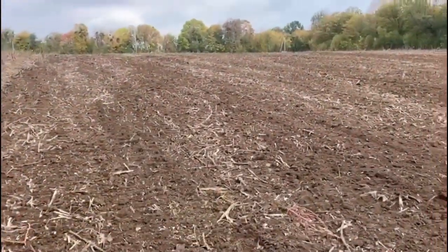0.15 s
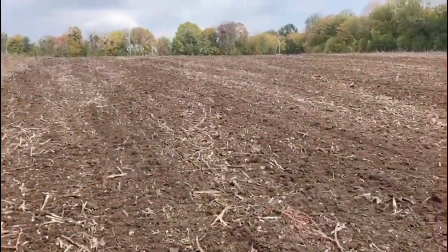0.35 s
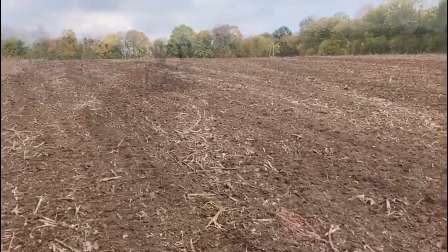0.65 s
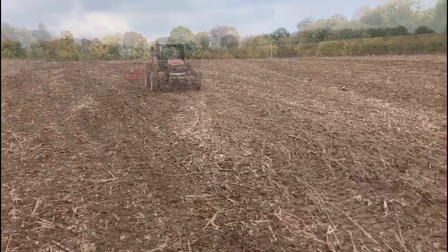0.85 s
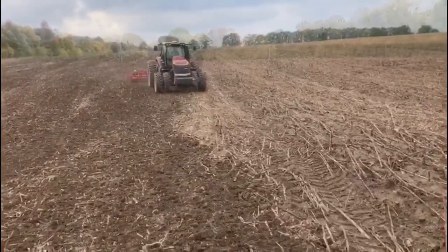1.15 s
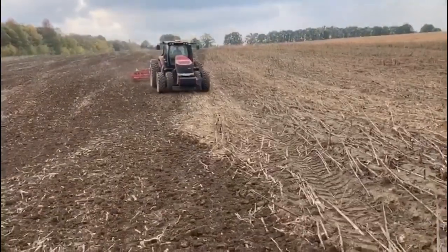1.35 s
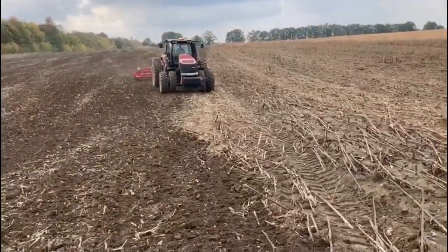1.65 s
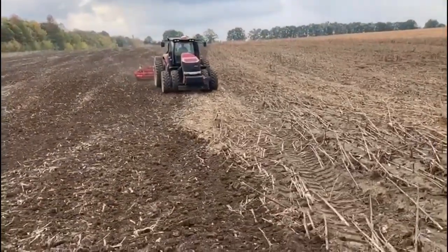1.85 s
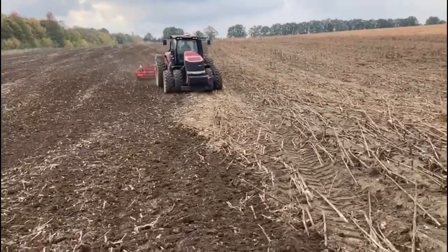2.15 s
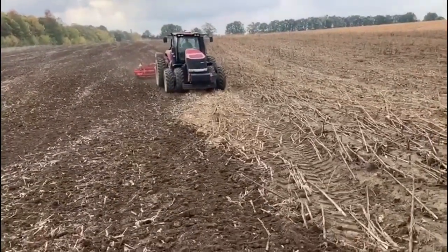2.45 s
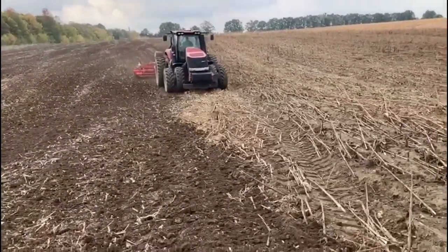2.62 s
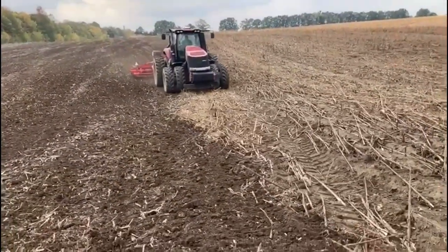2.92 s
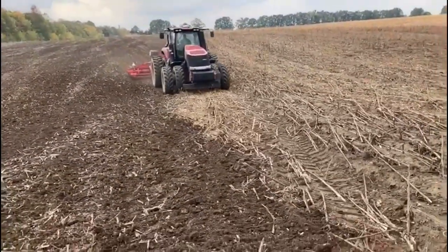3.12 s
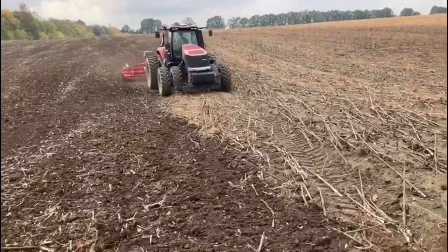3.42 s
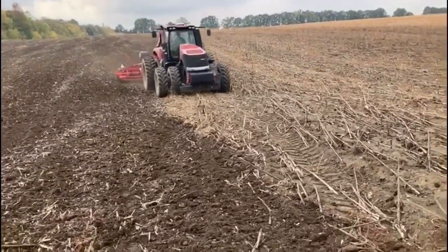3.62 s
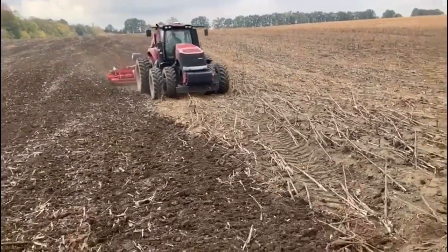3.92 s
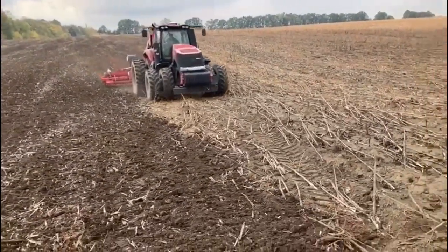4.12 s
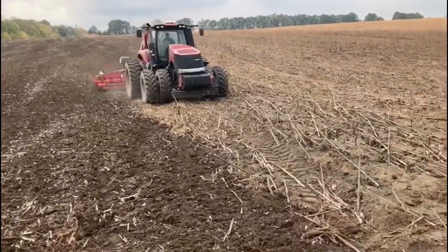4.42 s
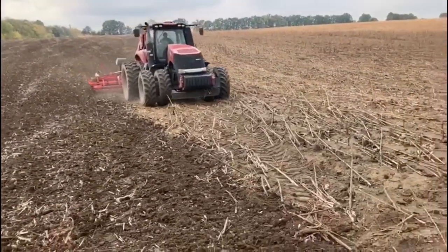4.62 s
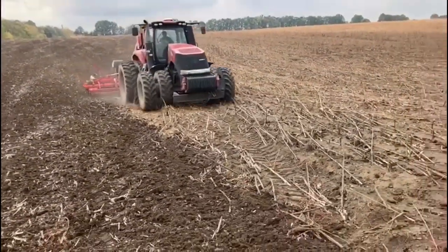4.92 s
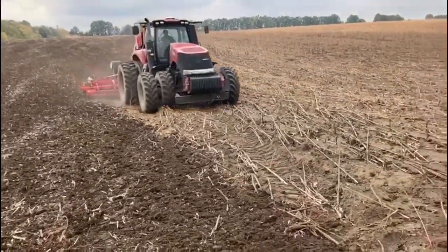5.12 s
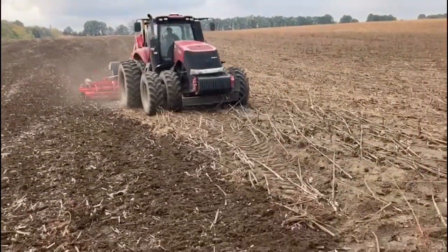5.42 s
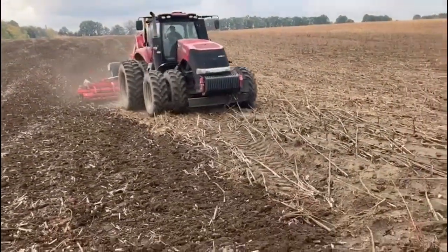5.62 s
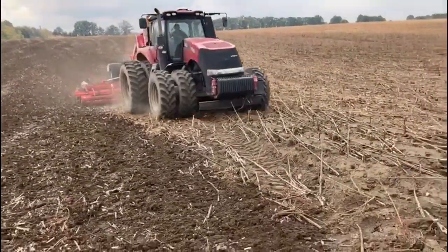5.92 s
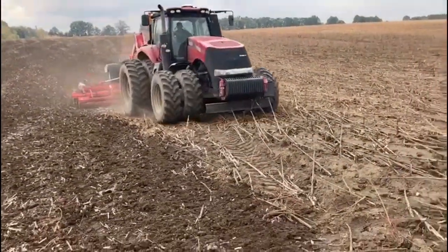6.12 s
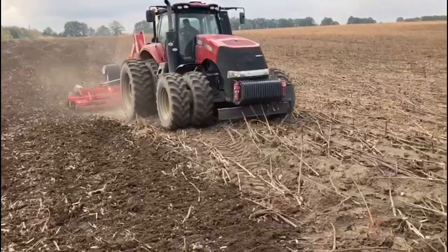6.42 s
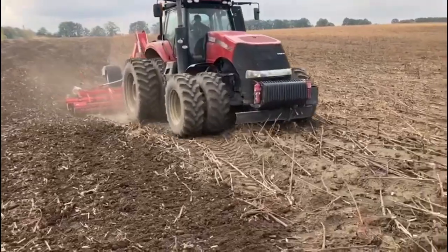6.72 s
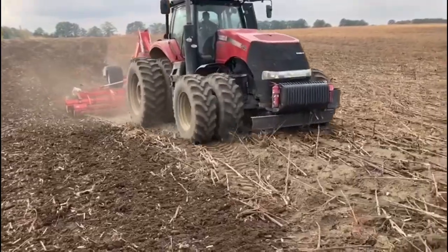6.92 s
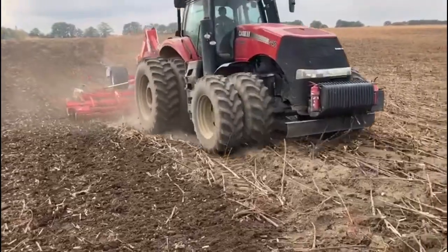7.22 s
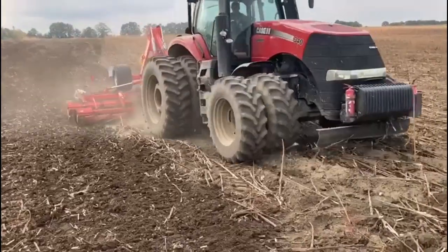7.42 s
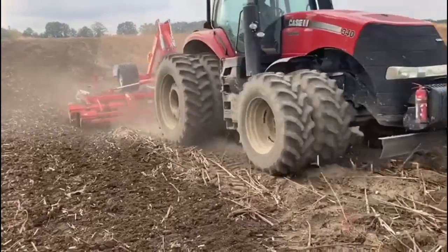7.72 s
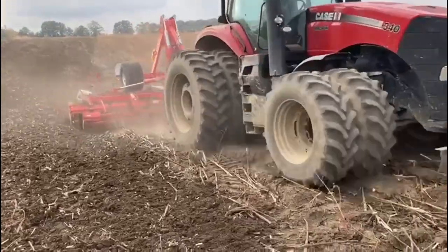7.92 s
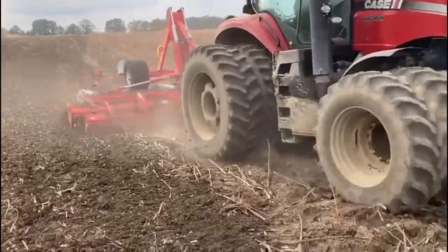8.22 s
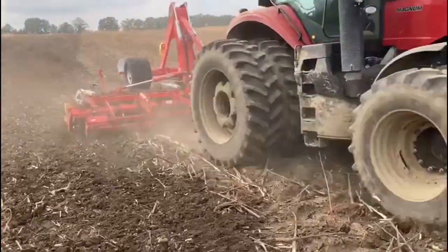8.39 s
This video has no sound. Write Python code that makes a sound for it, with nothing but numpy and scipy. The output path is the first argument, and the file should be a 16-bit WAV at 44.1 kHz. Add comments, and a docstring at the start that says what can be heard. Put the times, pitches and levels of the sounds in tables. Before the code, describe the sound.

Outdoors, wind buffets a small stereo microphone; a heavy tractor approaches with rattling engine knock, throaty exhaust and crackling dry stalks, loudest at the end.

```python
"""Diesel tractor and disc harrow in gusty wind

Gusts rumble, flutter and slap on a small two-port microphone: shaped noise, ringing pulses, low swings.
A six-cylinder tractor fades in and comes near: knock is gated noise ringing panels, exhaust is
sines on multiples of the engine cycle. Soil hisses as grainy noise, dry stalks snap as short noise bursts.
Left-right phase varies with pitch and shifts as the tractor passes; a ground echo colours its knock."""
import sys
import numpy as np
from scipy import signal
from scipy.fft import rfft, irfft, next_fast_len
from scipy.io import wavfile
from scipy.ndimage import uniform_filter1d

SR = 44100
rng = np.random.default_rng(int(sys.argv[2]) if len(sys.argv) > 2 else 0)


def unload_audio(sound):
    """Save the sound as a 16-bit wav file, at the path given as the first command line argument."""
    columns = np.transpose(np.atleast_2d(sound))
    # keep every value between -1 and 1, then stretch to whole-number steps
    steps = np.round(np.clip(columns, -1, 1) * 32767)
    wavfile.write(sys.argv[1], SR, steps.astype(np.int16))


def nominal_scale(level):
    """Amplitude ratio for a level in decibels (scalar or array-like)."""
    x = np.asarray(level, float) / 20
    return 10 ** x


N = 377055
HOP = 256


def rms_one(x):
    """Scale to rms 1."""
    return x / np.sqrt(np.mean(x ** 2) + 1e-20)


def in_time(rows):
    """Table columns joined by straight lines, one value a sample."""
    s, *columns = np.transpose(rows)
    return [np.interp(np.arange(N) / SR, s, column) for column in columns]


def drift(rate_hz):
    """Slow chance of spread 1: noise at SR/40 through a double one-pole."""
    pole = np.exp(-80 * np.pi * rate_hz / SR)
    noise = rng.standard_normal(N // 40 + 2002)
    slow = signal.lfilter([1], [1, -2 * pole, pole ** 2], noise)[2000:]  # drop the run-in
    return np.interp(np.arange(N) / 40, np.arange(len(slow)), rms_one(slow))


def swells(rows):
    """Bell-shaped level changes in dB, one line for each change column of (centre_s, length_s, change_db, ..)."""
    t = np.arange(0, N, 40) / SR
    centre_s, length_s, *changes_db = np.transpose(rows)
    bells = np.exp(-(2 * (t[:, None] - centre_s) / length_s) ** 2)
    return [np.interp(np.arange(N) / SR, t, bells @ change_db) for change_db in changes_db]


def colour(x, spectrum):
    """Shape by a spectrum; white noise keeps its rms."""
    size = next_fast_len(N)
    hz = np.arange(size // 2 + 1) * SR / size + 1
    point_hz, point_db = np.transpose(spectrum)
    db = np.interp(np.log(hz), np.log(point_hz), point_db)
    return irfft(rfft(x, size) * rms_one(nominal_scale(db)), size)[..., :N]


def pair(alike):
    """Two noises with the given correlation, 0-1."""
    first, second = rng.standard_normal((2, N))
    alike = np.clip(alike, 0, 1)
    return np.array([first, alike * first + np.sqrt(1 - alike ** 2) * second])


# wind level before the short changes: time_s, rumble_db, flutter_db
WIND_LEVELS = [(0, -26, -48), (.55, -28, -37), (.9, -24, -35), (1.25, -20.5, -33.5), (1.45, -14, -16.5),
               (1.95, -14.5, -21), (2.6, -15.5, -22.5), (3.6, -14.5, -28), (4.7, -20, -28.5),
               (5.2, -20.5, -35), (5.7, -23.5, -36.5), (6.3, -17.5, -32), (7.3, -17, -29.5),
               (7.8, -24.5, -32), (8.55, -25, -27)]
# short wind level changes, up or down: centre_s, length_s, rumble_change_db, flutter_change_db
WIND_CHANGES = [(.125, 0.078, 11.5, 14), (.205, .06, 9, 4), (.275, 0.09, 10, 7), (.45, 0.067, 17, 15),
                (.495, 0.043, 7, 11), (1.04, 0.052, 4, 8), (1.555, 0.019, 7, 8), (1.77, 0.051, 3, 13),
                (1.945, 0.075, -13, 12.5), (2.225, 0.034, -4, -5), (2.35, 0.032, -17, 9),
                (2.72, 0.02, -8, 2), (2.876, 0.024, 3, 12), (3.234, 0.062, -3, -10), (3.477, 0.039, -1, 3),
                (3.79, 0.027, 3, 17), (4.39, 0.032, 7, 7.5), (4.575, 0.14, 8.5, 2), (4.8, 0.27, 7.5, 0.5),
                (4.923, 0.057, -5, 13.5), (5.295, 0.024, 5, -8), (5.572, 0.091, 7, 22),
                (5.89, 0.15, 1, 13.5), (6.14, 0.077, 3, 11), (7.1, 0.062, 5, 5), (7.363, 0.045, 1, 6),
                (7.72, 0.037, 1, 14), (7.95, 0.081, 12, 9), (8.1, 0.044, 14, -6), (8.34, 0.032, -15, 4),
                (8.48, 0.073, 0, 4.5)]
# wind character: time_s, rumble_alike_0_1, upper_rumble_loss_0_1, drone_db
WIND_CHARACTER = [(0, 0.78, 0.85, -40.5), (.35, 0.92, 0.3, -44), (.6, 0.71, 0.7, -43.5),
                  (1.2, 0.52, 0.42, -58), (8.55, 0.39, 0.57, -70)]
# relative spectra: pitch_hz, density_db_per_hz
RUMBLE_SPECTRUM = [(15, -36), (28, -47), (48, -6), (75, -1.5), (110, -5.5), (200, -4.5), (320, -13.5),
                   (450, -30), (900, -71)]
FLUTTER_SPECTRUM = [(100, 18), (250, 9.5), (420, 9.5), (600, 2), (1100, -14), (1800, -16), (3000, -29),
                    (6000, -108)]
DRONE_SPECTRUM = [(300, 9), (700, 5.5), (1100, -8), (1400, -2), (1650, -5), (1900, -8), (3000, -10.5),
                  (3600, -16), (6000, -32)]


def wind():
    """Eddies on the ports: lumpy rumble, brighter flutter on the same lumps, slaps, thuds, a far drone."""
    rumble_db, flutter_db = np.add(in_time(WIND_LEVELS), swells(WIND_CHANGES))
    alike, dull, drone_db = in_time(WIND_CHARACTER)
    lumps = drift(28)

    rumble = colour(pair(alike), RUMBLE_SPECTRUM)
    deep = signal.sosfiltfilt(signal.butter(2, 150, fs=SR, output="sos"), rumble)
    rumble = rumble + np.clip(dull, 0, 1) * (deep - rumble)
    port_lumps = np.array([drift(12), drift(19)])
    rumble = rumble * nominal_scale(rumble_db + 2.35 * lumps + 2.5 * port_lumps)

    flutter_db = flutter_db + 2.1 * lumps + 3 * drift(35) + 1.2 * drift(16)
    flutter = colour(pair(0.82), FLUTTER_SPECTRUM) * nominal_scale(flutter_db)
    drone = colour(pair(0.04), DRONE_SPECTRUM) * nominal_scale(drone_db)
    return rumble + flutter + slaps() + thuds() + drone


# timed wind slaps, soft to hard: start_s, drive_db, ring_hz
TIMED_SLAPS = [(0.083, -27, 594), (0.107, -24, 680), (0.13, -26, 660), (0.184, -32, 681),
               (0.241, -22.5, 765), (0.248, -18.5, 780), (0.269, -22, 546), (0.4666, -1.5, 800),
               (0.482, -15, 860), (0.518, -38, 670), (0.766, -26, 690), (1.477, -15, 600), (1.5, -25, 600),
               (1.547, -13, 520), (1.596, -16, 560), (1.628, -8.5, 695), (1.662, -12, 1110),
               (1.705, -9, 705), (1.725, -4.5, 686), (1.76, -4, 740), (1.844, -8, 850), (1.886, -9, 600),
               (1.933, -6, 800), (1.945, -6, 560), (1.984, -11, 600), (2.075, -10, 600), (2.217, -29, 700),
               (2.245, -5.5, 620), (2.345, -10, 513), (2.377, -20, 560), (2.486, -5, 875),
               (2.528, -17, 650), (2.583, -10, 597), (2.656, -4.5, 1130), (2.679, -18, 650),
               (2.691, -4, 667), (2.832, -16, 600), (2.919, -29, 600), (2.986, -8, 696), (3.062, -9, 557),
               (3.16, -22, 560), (3.478, -7.5, 1050), (3.589, -19, 800), (3.835, -23, 560),
               (4.794, -8, 790)]


def slaps():
    """Each push rings a cycle or two in the port cavity with hum and a turbulent puff; hard ones are brighter."""
    out, t = np.zeros((2, N + 2000)), np.arange(2000) / SR
    # 16 more slaps at random, densest early in their span
    when, how, pitch = rng.random((16, 3)).T
    random_s = np.interp(when ** 2, [0, 1], (1.3, 4))
    random_db = -21 + 11 * (2 * how - 1)
    random_hz = np.interp(pitch, [0, 1], (680, 1210))

    cavity_s, cavity_db, cavity_full_db = .004, -4, -14
    hum_envelope = t / cavity_s * np.exp(1 - t / cavity_s)
    for start_s, db, ring_hz in [*zip(random_s, random_db, random_hz), *TIMED_SLAPS]:
        noise = rng.standard_normal(len(t))
        pan_db = 1.5 + 3 * rng.standard_normal()  # the left port faces the wind
        cycles = ring_hz * t
        ring = np.sin(2 * np.pi * cycles) * cycles * np.exp(-cycles / 0.41)

        puff_edge_hz = 1000 * 2 ** ((db + 12) / 18)
        puff_filter = signal.butter(4, puff_edge_hz, fs=SR, output="sos")
        puff = signal.sosfilt(puff_filter, noise * np.exp(-t / 0.003) * (1 - np.exp(-t / 0.002)))

        # above cavity_full_db slaps crack more but hum no louder
        hum_hz = 480 * (0.78 + ring_hz / 3500)
        hum_gain = nominal_scale(cavity_db + min(0, cavity_full_db - db))
        hum = hum_gain * np.sin(2 * np.pi * hum_hz * t) * hum_envelope

        at = round(start_s * SR)
        port_gain = nominal_scale(db + pan_db * np.array([[.5], [-.5]]))
        out[:, at:at + len(t)] += port_gain * (nominal_scale(12.5) * ring + hum + nominal_scale(4) * puff)
    return out[:, :N]


# deep pressure swings of the wind: centre_s, level_db, pitch_hz, length_s
WIND_THUDS = [(0.099, -16, 69.6, 0.028), (0.133, -16, 90, 0.02), (.279, -9, 177, 0.022),
              (0.446, -15, 85, 0.019), (0.495, -12, 66.6, 0.024), (1.377, -11, 90, 0.012),
              (1.417, -13, 130, 0.016), (1.459, -11, 100, 0.024), (1.568, -14, 80, .025),
              (1.606, -10, 141, .02), (1.678, -7.5, 130, 0.017), (1.779, -11, 74.5, 0.037),
              (1.817, -15, 140, 0.031), (1.999, -12, 149, 0.026), (2.067, -18, 90, 0.019),
              (2.222, -5.5, 106, 0.013), (2.287, -5, 89, 0.013), (2.498, -11, 90, 0.032),
              (2.538, -6.5, 98, 0.022), (2.712, -4, 73, 0.022), (3.15, -14, 99, 0.018),
              (3.221, -8, 67, 0.045), (3.251, -8, 90, 0.015), (4.402, -8.5, 89, 0.018),
              (4.624, -32, 90, 0.025), (4.799, -9, 99, 0.025), (5.295, -10, 78, 0.024),
              (7.106, -9.5, 75.4, 0.055), (7.36, -7.5, 99, 0.033), (7.716, -14, 81, 0.026)]


def thuds():
    """Each pressure swing is a low sine under a bell."""
    out, t = np.zeros(N), np.arange(-4000, 4000) / SR
    for centre_s, db, hz, length_s in WIND_THUDS:
        at = round(centre_s * SR) - len(t) // 2
        bell = np.exp(-(2 * t / length_s) ** 2)
        out[at:at + len(t)] += nominal_scale(db) * bell * np.sin(2 * np.pi * hz * t)
    return out


def resonance(x, hz, width_hz):
    """A resonance with a movable centre: shift it to zero, smooth, shift back; gain 1 on top."""
    pole = np.exp(-np.pi * width_hz / SR)
    turn = np.exp(2j * np.pi * np.cumsum(hz) / SR)
    return 2 * np.real(signal.lfilter([1 - pole], [1, -pole], x / turn) * turn)


# knock drive, relative: pitch_hz, density_db_per_hz
KNOCK_SPECTRUM = [(100, -26), (250, 10), (420, -5.5), (600, -0.5), (900, -0.5), (1400, -4.5), (1950, 0),
                  (2220, -4), (2900, -13), (3800, -14), (4800, -16), (5300, -117), (8000, -42)]
# block and bodywork resonances, ring against drive: pitch_hz, width_hz, far_db, close_db
BODY_PANELS = [(402.5, 40, 11, 6.5), (639, 18, -34, 0.5), (795, 20, -3.5, 2), (986, 17.6, 2, -4),
               (1099, 41, 2, -59), (1327, 6.7, -31, 8), (1417, 8.7, 2, -4), (1580, 15, 2, 7),
               (1864, 15, 3.5, 4), (2510, 40, -2, -1), (3274, 117, 4.5, 4.5), (4470, 170, -6.5, -5.5)]


def knock(cycle, level_db):
    """Noise swelling at each firing, every other cylinder louder, rings block and bodywork."""
    swell_db = 1.9 * np.cos(6 * cycle) + .9 * np.cos(3 * cycle) + .6 * np.cos(cycle)
    rattle_db = 1.8 * drift(220)  # valve gear and linkage tick unevenly
    gate = rms_one(nominal_scale(swell_db + rattle_db + 0.24 * drift(47)))
    drive = colour(rng.standard_normal((2, N)) * gate, KNOCK_SPECTRUM)

    close = np.clip((level_db + 25.5) / 6, 0, 1)  # other panels face the listener once it is near
    panels = np.zeros((2, N))
    for hz, width_hz, far_db, close_db in BODY_PANELS:
        # rocking over furrows sways each level; the twisting frame strays each pitch
        panel_db = far_db + close * (close_db - far_db) + 1.9 * drift(9.6)
        panel_hz = hz * (1 + .007 * drift(4))
        panels += nominal_scale(panel_db) * resonance(drive, panel_hz, width_hz)
    return (drive + panels) * nominal_scale(level_db + 0.23 * drift(4.7))


# dense grains and stalks, relative: pitch_hz, density_db_per_hz
HISS_SPECTRUM = [(2000, 0.5), (4000, 1), (5300, -2), (6500, -1), (8500, 5), (9900, 0), (10500, -1),
                 (11500, 10), (11900, 12), (12150, -7)]
# patches of stalks under the tyres, mostly swelling the hiss: centre_s, length_s, change_db
STALK_CRUNCHES = [(1.168, 0.073, 3), (1.52, .06, 2), (1.735, 0.18, 3), (1.866, 0.038, 5.5),
                  (2.171, 0.06, 7), (2.24, 0.08, 8.5), (2.592, 0.046, 5.5), (3.0, 0.098, 8.5),
                  (3.19, 0.064, 4.5), (3.48, 0.089, 4.5), (3.9, 0.046, -1), (4.13, 0.047, 3),
                  (4.45, 0.083, 3), (5.165, 0.33, 5.5), (5.687, 0.026, -1), (5.9, 0.04, 4),
                  (6.877, 0.037, 7), (7.21, 0.076, 4.5), (7.48, 0.045, 2.5), (7.85, 0.036, 7),
                  (8.424, 0.036, 1)]


def soil(hiss_db):
    """Dense crumbling grains of uneven size under tyres and discs, changing in patches."""
    grains = nominal_scale(1.3 * drift(23.6) + 0.59 * drift(190) + 2.46 * drift(2))
    level = nominal_scale(hiss_db + swells(STALK_CRUNCHES)[0])
    return colour(rng.standard_normal((2, N)) * level * rms_one(grains), HISS_SPECTRUM)


# exhaust lines, every sixth order a firing multiple:
# cycle_multiple, far_db, near_db, abreast_db, passed_db
EXHAUST_ORDERS = [(3, -15, -15, -13, -14), (4, -13, -11, -10, -10), (5, -12, -12, -16, -16),
                  (6, -1, -3, -7, -8), (7, -14, -14, -16, -16), (9, -13, -19, -14, -12),
                  (11, -17, -16, -15, -14), (12, -6, -11, 0, 1), (13, -18, -17, -13, -14),
                  (14, -19, -17, -9, -13), (15, -19, -2, -2, -7), (16, -19, -3, -5, -8),
                  (17, -16, -10, -15, -15), (18, -3, -5, -1, -15), (21, -19, -19, -22, -20),
                  (24, -17, -17, -24, -11), (25, -16, -20, -24, -15)]


def exhaust(cycle, stage, level_db):
    """Wavering sines on multiples of the engine cycle; their balance shifts as the stack nears and passes."""
    out = np.zeros(N)
    for order, *stage_db in EXHAUST_ORDERS:
        gain = nominal_scale(level_db + np.interp(stage, range(4), stage_db) + 2 * drift(6))
        phase = order * cycle + rng.uniform(0, 2 * np.pi) + 0.45 * drift(4.5)
        out += gain * np.sqrt(2) * np.sin(phase)
    return out


def bursts(events, decay_s):
    """Envelope of short bursts: sudden start, exponential fall."""
    start_s, level_db = np.transpose(events)
    clicks = np.zeros(N)
    clicks[np.round(start_s * SR).astype(int)] = nominal_scale(level_db)
    return signal.lfilter([1], [1, -np.exp(-1 / (decay_s * SR))], clicks + 1e-18)


# stalks breaking: start_s, drive_db
STALK_SNAPS = [(1.1548, -12), (3.004, -18), (3.8925, -4), (4.1185, -14), (5.1725, 0), (6.163, -10),
               (6.248, 6), (6.3455, -13), (6.6998, -8), (7.103, -3), (7.3148, -8), (7.4794, -7),
               (8.0675, -14)]


def snaps():
    """Dry stalks break: bright noise dying within milliseconds, mostly alike at the ports."""
    return colour(pair(0.88) * bursts(STALK_SNAPS, decay_s=0.002), HISS_SPECTRUM) * nominal_scale(-7)


# moving swell and hollow in the roar: time_s, swell_hz, swell_change_db, hollow_hz, hollow_change_db
ROAR_SHAPE = [(0, 1140, 8, 800, 1), (2.8, 1140, 13.5, 814, 2), (3.4, 1054, 7, 1420, -4),
              (4.4, 955, 6.5, 1240, -6), (4.9, 830, 3, 1200, 3), (5.3, 904, 7, 556, -8.5),
              (6.1, 816, 7.5, 565, -7.5), (6.4, 760, 8, 640, 5.5), (6.7, 990, 5, 513, 1),
              (7.2, 950, 2.5, 550, 0), (7.7, 866, -4, 560, -6.5), (8.1, 895, 1, 520, 3),
              (8.55, 870, -2, 517, -1)]
# upper mids of the roar: time_s, change_db
UPPER_MIDS = [(0, 5), (2, -5.5), (3.5, -2), (4.5, -4), (5, 11.5), (5.6, 1), (6.5, 2.5), (7.2, 6), (7.8, -1),
              (8.55, 4)]
# dips in the roar: pitch_hz, width_hz, change_db
ROAR_DIPS = [(2175, 237, -11), (3042, 150, -5)]


def shading(hz, s):
    """Gain over pitch and time: moving swell and hollow, upper mids, wandering dips, random blotches."""
    def bell(centre_hz, db, width_hz):
        return db * np.exp(-(2 * (hz[:, None] - centre_hz) / width_hz) ** 2)

    time_s, *columns = np.transpose(ROAR_SHAPE)
    swell_hz, swell_db, hollow_hz, hollow_db = [np.interp(s, time_s, column) for column in columns]
    db = bell(swell_hz, swell_db, 47) + bell(hollow_hz, hollow_db, 240)
    db = db + bell(3000, np.interp(s, *np.transpose(UPPER_MIDS)), 450)

    wander_hz = 35 * np.interp(s * SR, np.arange(N), drift(13))
    for dip_hz, width_hz, dip_db in ROAR_DIPS:
        db = db + bell(dip_hz + wander_hz, dip_db, width_hz)

    # furrows and rocking panels blotch the roar
    patch_db, patch_hz, patch_s = 2, 130, .06
    blotch = rng.standard_normal((len(hz), len(s)))
    for axis, size in enumerate([patch_hz / hz[1], patch_s / s[1]]):
        for _ in range(2):
            blotch = uniform_filter1d(blotch, int(size), axis=axis)
    return nominal_scale(db + patch_db * rms_one(blotch))


def frames(x):
    """Short-time spectra: (hz, s, values)."""
    return signal.stft(x, SR, nperseg=4 * HOP, noverlap=3 * HOP)


# tractor fading in and drawing near: time_s, knock_db, exhaust_db, soil_hiss_db
TRACTOR_LEVELS = [(0, -78, -74, -82), (.45, -68, -68, -66), (.65, -46, -62, -66), (.9, -41.5, -52, -51.5),
                  (1.4, -31.5, -47, -43.5), (2.4, -30.5, -62, -42), (3.2, -29, -27, -39.5),
                  (4.4, -28, -31, -34.5), (4.75, -24.5, -40, -33), (5.1, -21, -20.5, -34),
                  (6, -19, -24, -27), (6.4, -22.5, -21, -27), (6.9, -18, -21, -26),
                  (7.4, -19, -21.5, -24.5), (8, -20.5, -21, -27.5), (8.55, -18.5, -19, -23)]
# engine: time_s, cycles_per_s
ENGINE_SPEED = [(0, 16.68), (4.5, 16.68), (5.5, 16.71), (6.5, 16.75), (7.1, 16.76), (7.6, 16.68), (8, 16.6),
                (8.55, 16.56)]
# exhaust position: time_s, stage (0 far, 1 near, 2 abreast, 3 passed)
EXHAUST_STAGE = [(0, 0), (6.3, 0), (6.95, 1), (7.55, 1.3), (7.85, 2), (8.3, 3), (8.55, 3)]
# tractor bearing: time_s, ground_echo_ms, facing_0_1
TRACTOR_BEARING = [(0, 1, 0), (2, 0.27, 0), (4.4, 0.76, 0.13), (4.75, 0.16, 0), (5, 0.79, 0),
                   (6, 0.92, 0.11), (6.4, 0.67, 0), (7.1, 0.86, 0.07), (7.45, 0.44, 0.63),
                   (7.9, 0.86, 0.96), (8.2, 0.6, 1), (8.55, 0.68, 1)]
# left-right phase and likeness by pitch, in steps in the treble; it shifts as the tractor passes:
# pitch_hz, left_lead_far_rad, left_lead_facing_rad, left_right_db, alike_0_1
STEREO_LOWER = [(30, .1, .3, -.3, .8), (100, .8, 1.2, -.5, .8), (140, 1.4, .5, 0, .9),
                (200, 2.3, 0, 0, .92), (250, 3, 0, 0, .92), (300, 3.9, 0, 0, .92), (420, 5.7, 0, 0, .92),
                (600, 6.3, 0, .5, .88), (900, 7, .1, -1, .9), (1350, 7.1, -1.1, 3, .8),
                (1650, 6.8, -.6, 4, .85), (1900, 6.7, .1, -.5, .9), (2150, 8.1, .9, -1.5, .7),
                (2260, 11.7, .1, -1.5, .6), (2480, 12.6, .1, -1.5, .9), (2650, 14, .2, -1, .8),
                (2800, 15.7, 1.6, -1, .93), (3050, 18.1, 2, -1.5, .65), (3300, 19.4, 3.3, -1.5, .7),
                (3700, 20.6, 3.5, -1, .65), (4000, 21.6, 6, -1, .6), (4600, 22.2, 5.7, 0, .6)]
STEREO_TREBLE = [(4900, 21.5, 7.5, 0, .9), (5170, 22, 8.8, 0, .97), (5750, 22, 8.3, 0, .97),
                 (6100, 21, 7.5, 0, .7), (6400, 18.85, 6.28, 0, .99), (7400, 18.85, 6.28, 0, .99),
                 (7900, 17.3, 4.73, 0, .6), (8450, 15.71, 3.14, 0, .995), (9550, 15.71, 3.14, 0, .995),
                 (10100, 14.2, 1.63, 0, .55), (10650, 12.57, 0, 0, .995)]


def scene():
    """All sources are summed; left-right phase and likeness vary with pitch and shift as the tractor passes."""
    knock_db, exhaust_db, hiss_db = in_time(TRACTOR_LEVELS)
    echo_ms, facing = in_time(TRACTOR_BEARING)
    stage, = in_time(EXHAUST_STAGE)
    cycle = 2 * np.pi * np.cumsum(in_time(ENGINE_SPEED)[0]) / SR

    gusts = frames(wind() + snaps())[2]
    hz, s, (direct, scattered) = frames(knock(cycle, knock_db))
    soil_direct, soil_scattered = frames(soil(hiss_db))[2]
    tones = frames(exhaust(cycle, stage, exhaust_db))[2]
    at = np.minimum((s * SR).astype(int), N - 1)
    column_hz = hz[:, None]

    echo = 0.22 * np.exp(-(column_hz / 1800) ** 2)  # rough soil mirrors only the lower tones
    ground = 1 + echo * np.exp(-2j * np.pi * column_hz * echo_ms[at] / 1000)
    ground = ground * shading(hz, s)
    direct = direct * ground + soil_direct
    scattered = scattered * ground + soil_scattered

    point_hz, *columns = np.transpose(STEREO_LOWER + STEREO_TREBLE)
    far, close, pan_db, alike = [np.interp(hz, point_hz, column)[:, None] for column in columns]
    alike = np.clip(alike, 0, 1)
    right_mix = alike * direct + np.sqrt(1 - alike ** 2) * scattered
    left = (direct + tones) * nominal_scale(pan_db / 2) + gusts[0]
    right = (right_mix + tones) * nominal_scale(-pan_db / 2) + gusts[1]

    # below 294 Hz the turn shows later, the lower the tone
    lateness = np.clip((294 / (column_hz + 1)) ** 4.8, 1, 5)
    turned = np.clip(facing, 0, 1)[at] ** lateness
    lead = far + turned * np.angle(np.exp(1j * (close - far)))  # the shorter way round
    both = np.array([left, right * np.exp(-1j * lead)])
    return signal.istft(both, SR, nperseg=4 * HOP, noverlap=3 * HOP)[1][:, :N]


def roll_off(x):
    """The treble ends steeply here."""
    return signal.sosfilt(signal.butter(12, 12890, fs=SR, output="sos"), x)


def record(dry):
    """Cut the bottom, round the peaks, cut the top."""
    light = signal.sosfilt(signal.butter(2, 35, "high", fs=SR, output="sos"), dry)
    rounded = .92 * np.tanh(light / .92)
    low_pass = signal.cheby2(10, 60, 12750, fs=SR, output="sos")  # 60 dB down from 12750 Hz
    finished = signal.sosfilt(low_pass, rounded)
    return roll_off(finished)


dry = scene()
out = record(dry)
unload_audio(out)
```